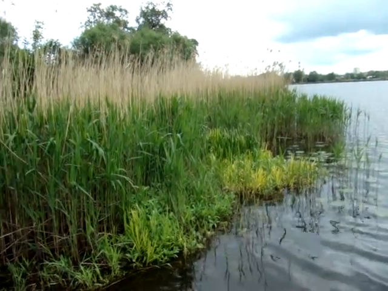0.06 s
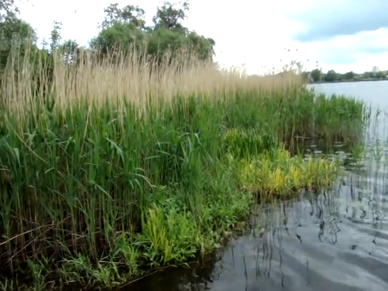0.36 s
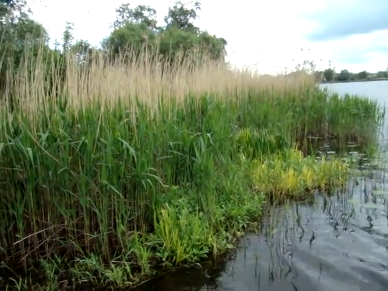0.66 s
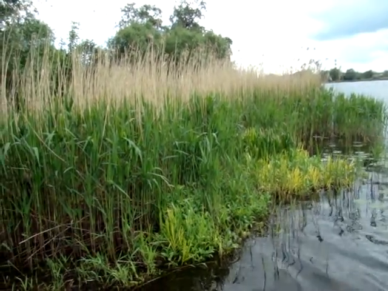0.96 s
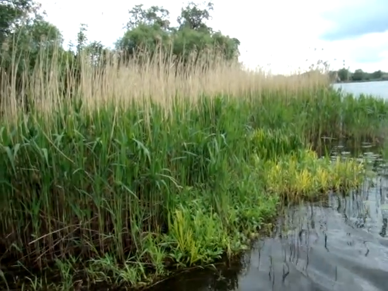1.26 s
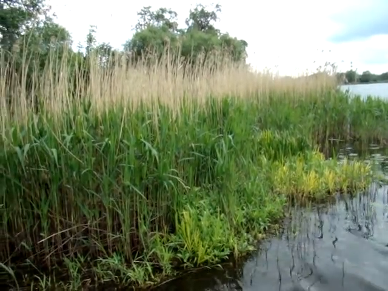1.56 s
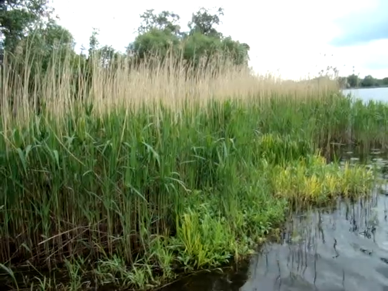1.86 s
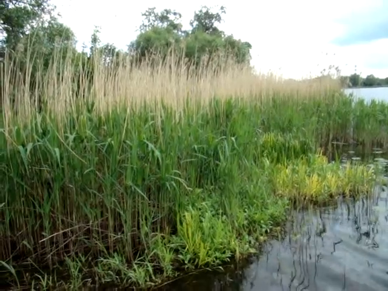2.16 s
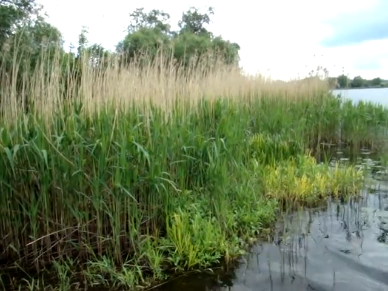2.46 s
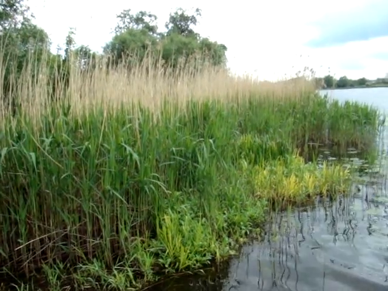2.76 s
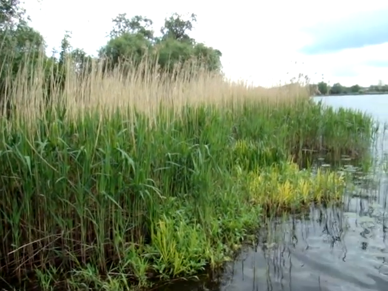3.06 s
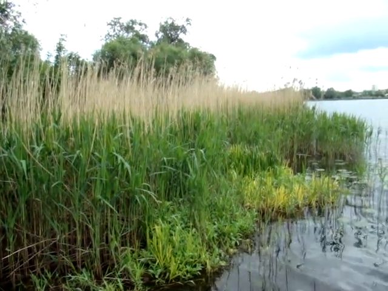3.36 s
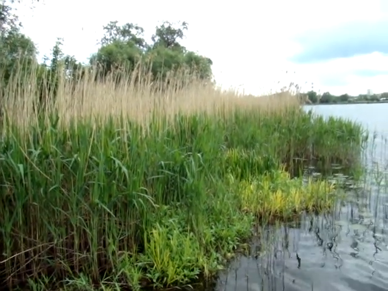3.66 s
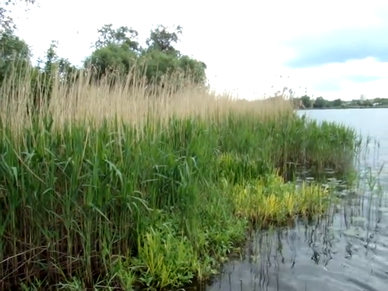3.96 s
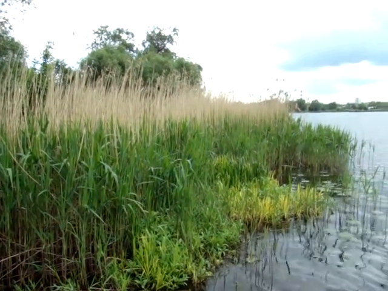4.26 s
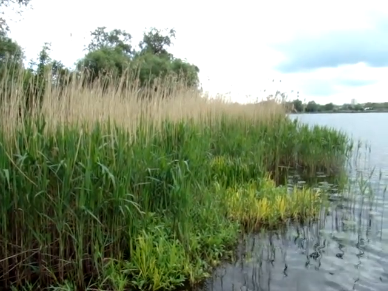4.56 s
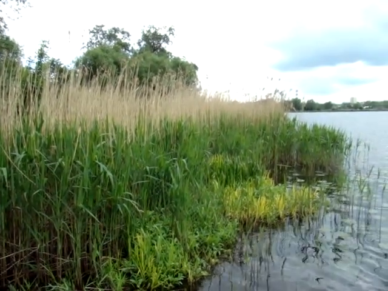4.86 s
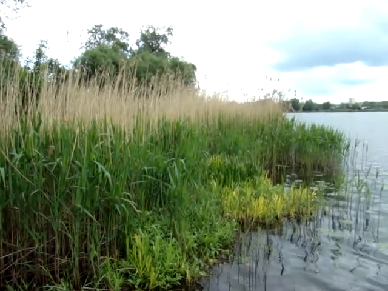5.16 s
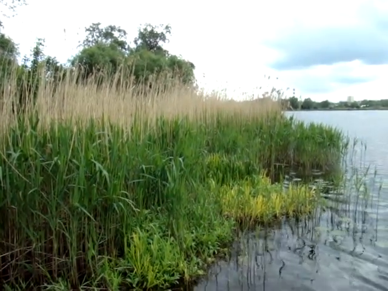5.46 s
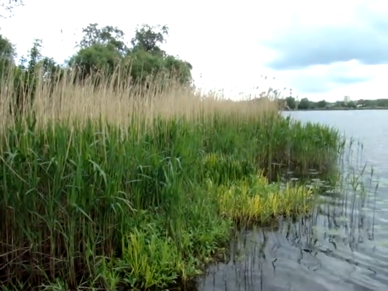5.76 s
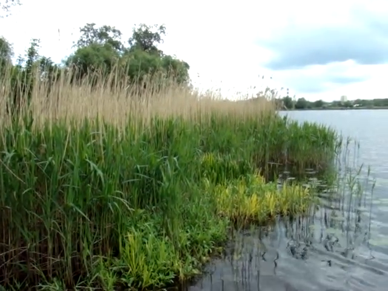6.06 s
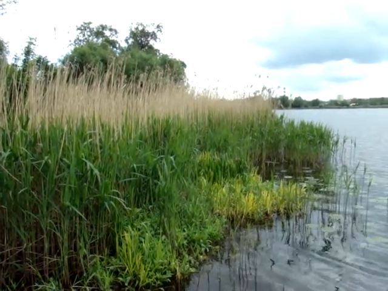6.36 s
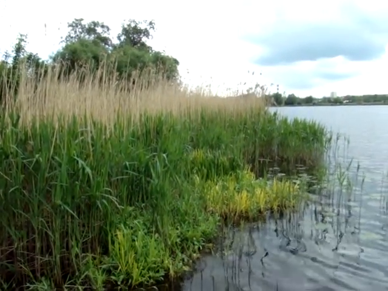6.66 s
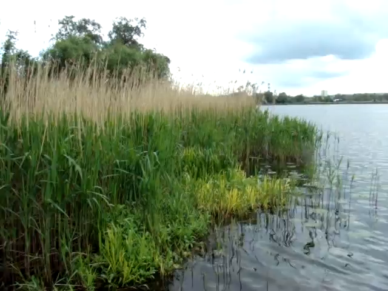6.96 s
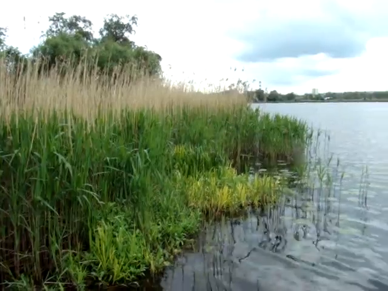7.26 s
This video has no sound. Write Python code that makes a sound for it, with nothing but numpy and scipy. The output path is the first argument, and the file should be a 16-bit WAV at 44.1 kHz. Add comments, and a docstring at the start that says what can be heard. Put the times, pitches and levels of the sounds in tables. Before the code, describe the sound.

Outdoors at a reedy lake shore, a soft hiss of wind and water lies under a nearby warbler. It starts with dry paired chucks and two squeaks, grows louder with four raspy notes, whistles once, then gives four harsh calls. A much fainter bird follows with slurred notes and evenly spaced chips from far away. A few small water plops and quiet camera lens ticks and whirs sit close to the microphone.

```python
"""A warbler sings in lakeside reeds: dry chucks, two squeaks, four grating notes, a nasal whistle and
four harsh calls. Its syrinx is the source and its throat the filter; a buzz modulates short tones
into rasps, and scattering by the reeds adds a short tail. A far songbird answers in gliding tones.
Ripples plop at the bank as damped noise bursts, and a camera's lens drive faintly rings its case.
A soft whir, probably the camera's motor, swells at times over a broadband wash of wind and water."""
import sys
import numpy as np
from scipy import signal
from scipy.fft import rfft, irfft, next_fast_len
from scipy.io import wavfile
from scipy.ndimage import uniform_filter1d

SR = 44100
rng = np.random.default_rng(int(sys.argv[2]) if len(sys.argv) > 2 else 0)


def to_wav(sig):
    """Store sig (one row per channel, or 1-D mono) as 16-bit WAV at the path in sys.argv[1].

    Samples outside -1..1 are clipped; the rate is SR.
    """
    pcm = np.clip(np.atleast_2d(sig), -1, 1) * 32767
    pcm = np.round(pcm).astype(np.int16)
    wavfile.write(sys.argv[1], SR, pcm.T)  # frames by channels


N = 326242
TIME = np.arange(N) / SR

# Levels in the tables are relative; the functions apply further gains.
# grating notes: start_s, level_db, pitch_hz, spacing_ratio, crescendo_db_per_s, rasp_ratio
GRATING_NOTES = [(2.001, -23.5, 3110, 0.88, 47, .7), (2.256, -17, 3317, 1.0, -7, 0.97),
                 (2.511, -17.5, 3376, 1.0, -17, 1.5), (2.757, -17, 3540, 0.98, -15, 1.36)]
# strokes of a grating note (a faint stutter, two rasps, a quick trill):
# centre_offset_s, nominal_length_s, level_db, pitch_ratio, nominal_glide_hz, rasp_ratio
GRATING_STROKES = [(-.051, 0.0046, -19.5, 1.06, -300, .9), (-.042, .005, -21.5, 0.95, -400, 0.7),
                   (-.028, 0.013, -20.5, 1.2, -200, 1), (-.013, 0.0044, -8.5, 1.07, -100, 1),
                   (-.006, .005, -5, 1.08, 100, 1), (.0005, .007, -1, 1.01, -100, 0.42),
                   (.009, 0.0064, -8, 0.92, -200, 0.8), (0.019, 0.0082, -1, 1.02, -200, .75),
                   (.027, 0.0056, -6, .97, -400, .8), (0.043, .012, -11.5, 1.0, -100, 0.6),
                   (0.05, 0.0025, -2.5, .99, -58, 0.1), (.0545, 0.0037, 1.5, 1.02, 68, 0.39),
                   (0.063, .0045, -.5, 1.03, -150, .75), (.068, 0.0037, -6, 1.02, -350, .85),
                   (0.079, .008, -3, .92, -400, 0.94)]
# harsh calls: start_s, level_db, pitch_hz, spacing_ratio, crescendo_db_per_s, rasp_ratio
HARSH_CALLS = [(3.412, -14.3, 3550, 1.0, 20, 1.0), (3.588, -13.3, 3560, 1.01, -5, 1.0),
               (3.870, -13, 3540, .99, -12, 1.0), (4.044, -14.6, 3510, 1.0, -12, 1.1)]
# strokes of a harsh call (a faint tick, then four rasps, the middle two entered from above):
# centre_offset_s, nominal_length_s, level_db, pitch_ratio, nominal_glide_hz, rasp_ratio
HARSH_STROKES = [(-.023, .004, -15, 1.0, -500, .9), (.0062, .0102, .5, .98, -60, .75),
                 (.02, .0065, -5, 1.07, -250, .85), (.032, .013, -.3, 1.0, -200, .87),
                 (.052, .0115, -4.5, 1.125, -200, .7), (.062, .0125, -.3, 1.0, -160, .8),
                 (.078, .0125, -2.8, .99, -260, .9)]
# lower edge of the throat's passband, rising as the beak opens: time_s, edge_hz
THROAT_EDGE = [(2.0, 2400), (2.8, 2600), (3.4, 2920)]
# spectrum of the noise skirt around the rasps: frequency_hz, gain_db
SKIRT_SPECTRUM = [(500, -28), (1100, -33), (1600, 12.5), (2150, 9.5), (2450, 3), (3500, -30), (4800, -5),
                  (5700, 12.5), (6300, -3), (7600, 2.5), (8600, 1.5), (9300, 4.5), (9900, -0.5)]
# dry chucks: start_s, level_db, nominal_pitch_hz
CHUCKS = [(0.174, -26, 2900), (0.326, -27, 2710), (0.588, -24.5, 2760), (0.7555, -23.5, 2740),
          (1.0461, -22, 2840), (1.2037, -22, 2940)]
# squeaks, in each of which the voice breaks: break_s, level_db, roughness_ratio
SQUEAKS = [(1.466, -0.5, 0.88), (1.733, 0.5, 1.6)]
# a squeak's slide up to the break: time_from_break_s, pitch_hz, level_db, roughness_ratio
SQUEAK_SLIDE = [(-.063, 1428, -53, 0.01), (-.035, 1473, -35, 0.18), (-.013, 1537, -29.5, 0.13),
                (0, 1835, -26, 0.48), (.007, 1815, -32, .45)]
# the lower pitch it then holds: time_from_break_s, pitch_hz, level_db, roughness_ratio
SQUEAK_HOLD = [(-.004, 1383, -42, 0.42), (.002, 1385, -22, 0.33), (0.029, 1376, -25.5, 0.13),
               (.046, 1382, -29.5, .25), (.057, 1370, -33, 0.11)]
# the whistle scoops up, climbs and holds: time_s, pitch_hz, level_db, roughness_ratio
WHISTLE = [(3.011, 1180, -46, .5), (3.02, 1370, -27, 0.1), (3.029, 1423, -24.5, 0.06),
           (3.06, 1413, -23.5, 0), (3.098, 1461, -25.5, 0.1), (3.168, 1469, -26.5, 0.17),
           (3.186, 1480, -48, 0.4)]
# throat response for the squeaks and the whistle: frequency_hz, gain_db
THROAT_RESPONSE = [(1400, -17.5), (2100, -20), (2780, -9), (2950, -6), (3650, 4), (4200, -1.5), (4450, -3),
                   (4900, -5), (5500, 1.5), (5950, -0.5), (6400, -34), (7300, -16), (8700, -21.5),
                   (9700, -15), (10300, -56)]
# the far bird's slurs: start_s, length_s, level_db, nominal_pitch_hz, shape_name
FAR_SLURS = [(1.588, 0.082, -45, 2950, "rise"), (4.376, 0.032, -47, 3090, "level"),
             (4.437, .026, -45, 3210, "rise"), (4.47, .045, -45.5, 2750, "fall"),
             (5.038, 0.063, -45, 2420, "level"), (5.312, 0.059, -45, 2430, "fall"),
             (5.423, 0.096, -49, 3800, "dip"), (5.495, .035, -53, 3640, "fall"),
             (5.596, 0.081, -47.5, 2520, "fall"), (5.602, .085, -48.5, 3700, "dip"),
             (5.682, 0.028, -47, 3480, "fall"), (5.835, 0.048, -47, 3410, "rise"),
             (6.047, 0.059, -47, 3410, "rise"), (6.257, 0.042, -48.5, 3400, "rise"),
             (6.352, .07, -52, 3100, "rise"), (6.78, .1, -59, 3800, "dip"),
             (7.167, 0.072, -52, 3250, "rise")]
# pitch contour for each shape_name: start_ratio, middle_ratio, end_ratio
SLUR_SHAPES = {"rise": (.92, 0.99, 1.16), "fall": (1.15, 0.94, .87), "dip": (1.03, 1, 1.08),
               "level": (0.98, 1.01, 0.92)}
# the far bird's chips: start_s, level_db
FAR_CHIPS = [(5.784, -42.5), (5.947, -42), (6.102, -41), (6.251, -43), (6.402, -43.5), (6.559, -42.5),
             (6.718, -43.5), (6.888, -45.5), (7.04, -47)]
# plops of water: start_s, level_db, pitch_hz
PLOPS = [(0.307, -27, 364), (0.812, -35, 926), (0.819, -26, 620), (0.918, -29, 920), (0.999, -36, 797),
         (2.679, -27, 1390)]
# runs of lens drive steps: start_s, step_count, frames_per_step, level_db
LENS_RUNS = [(.49, 16, 2, -31), (1.822, 4, 3, -31.5), (2.291, 6, 2, -32), (4.457, 6, 2, -35),
             (4.891, 6, 2, -35), (5.489, 4, 2, -28.5), (5.756, 5, 2, -33)]
# swells of soft whirring hiss: hold_start_s, hold_length_s, level_db
WHIRS = [(.26, .36, -45.5), (4.84, .46, -44), (7.25, .2, -46.5)]
# spectrum of the whir: frequency_hz, gain_db
WHIR_SPECTRUM = [(800, -6), (1150, 1), (1350, 18), (1600, 5.5), (2200, 3), (3200, 2), (4500, -1.5),
                 (5700, -1), (6500, -8.5), (8000, -12), (10000, -28)]
# spectrum of wind and water: frequency_hz, gain_db
WASH_SPECTRUM = [(15, -60), (25, -36), (85, -16), (107, -9), (227, 0), (384, -1), (414, -6.5), (719, -4),
                 (857, -7), (1770, -8), (2010, -10.5), (2520, -13), (2780, -12.5), (5480, -25),
                 (10000, -30), (13000, -62.5), (22000, -120)]
# the breeze comes and goes: time_s, level_db
BREEZE = [(0, -47.5), (.75, -47.5), (1.5, -46.5), (2.2, -45.5), (2.55, -45.5), (3.15, -48.5), (3.8, -47),
          (4.5, -49), (5.15, -48), (5.8, -47.5), (7.2, -48.5), (7.4, -47.5)]
# faint steady rings: centre_hz, width_hz, level_db
RINGS = [(395.5, 2.5, -61), (225, 24, -61.5), (857, 296, -53), (1614, 360, -53), (2960, 21, -64.5)]
# spells of a thin wavering whine: hold_start_s, hold_length_s, level_db
WHINE_SPELLS = [(2.75, 0.64, -55), (3.18, .1, -51.5), (4.15, 0.21, -51), (5.2, .4, -49.5),
                (6.65, 0.87, -51)]
# one brief bright hiss: hold_start_s, hold_length_s, level_db
SWISHES = [(.265, 0.072, -49)]


def warbler(chuck_db=-10, close_after_s=.076, close_db=-5, close_hz=2950):
    """Source and filter: the syrinx drives the throat in rasps, chucks, squeaks and a whistle."""
    out = rasps(GRATING_NOTES, GRATING_STROKES, skirt_db=-23,
                sizzle_db=-25, sizzle_ratio=2.64, sizzle_width_hz=1700,
                second_db=-34, third_db=-40, buzz_hz=961, depth=.37, bend_rad=.51, top_hz=5100)
    out += rasps(HARSH_CALLS, HARSH_STROKES, skirt_db=-21,
                 sizzle_db=-28, sizzle_ratio=2.62, sizzle_width_hz=2900,
                 second_db=-31.5, third_db=-30, buzz_hz=736, depth=.46, bend_rad=.62, top_hz=4500)
    # each grating note closes on a low chuck
    closes = [(start + close_after_s * spacing, db + crescendo * close_after_s + close_db, close_hz)
              for start, db, _, spacing, crescendo, _ in GRATING_NOTES]
    for start, db, hz in CHUCKS + closes:
        offset, sound = chuck(hz)
        add(out, start + offset, amp(db + chuck_db) * sound)
    for break_s, db, roughness in SQUEAKS:
        for contour in (SQUEAK_SLIDE, SQUEAK_HOLD):
            offset, sound = nasal_tone(np.array(contour) * [1, 1, 1, roughness])
            add(out, break_s + offset, amp(db) * sound)
    add(out, *nasal_tone(WHISTLE))
    return out


def rasps(notes, strokes, skirt_db, sizzle_db, sizzle_ratio, sizzle_width_hz, **voice):
    """Amplitude modulation: a wide noise skirt and a high sizzle follow the envelope of the strokes."""
    spread_db, pitch_spread = 1.9, .0062  # no two strokes are quite alike
    tones, sizzle = np.zeros((2, N))
    for note_s, note_db, hz, spacing, crescendo, note_rasp in notes:
        edge_hz = curve(THROAT_EDGE, note_s)
        for offset, length, db, ratio, glide, rasp in strokes:
            softer, higher = rng.standard_normal(2)
            gain = amp(note_db + db + crescendo * offset - spread_db * softer)
            pitch = hz * ratio * (1 + pitch_spread * higher)
            sound = gain * stroke(length, pitch, glide, rasp * note_rasp, edge_hz, **voice)
            hiss = narrow_noise(len(sound), sizzle_ratio * hz, sizzle_width_hz)
            start = note_s + offset * spacing - len(sound) / SR / 2
            add(tones, start, sound)
            add(sizzle, start, abs(signal.hilbert(sound)) * hiss)
    envelope = np.sqrt(abs(uniform_filter1d(tones ** 2, size=130)))
    return tones + amp(skirt_db) * envelope * coloured(SKIRT_SPECTRUM) + amp(sizzle_db) * sizzle


def stroke(length, hz, glide, rasp, edge_hz, second_db, third_db, buzz_hz, depth, bend_rad, top_hz):
    """A buzz from one side of the syrinx modulates the amplitude and phase of the other side's tone."""
    stretch, jitter = 1.45, .076
    size = int(length * stretch * SR)
    rasp = np.clip(rasp, 0, 1)
    position = np.linspace(-.5, .5, size) * stretch
    # with the beak wide open, long strokes start higher and fall further
    opening = np.clip((edge_hz - 2500) / 400, 0, 1)
    fall = 520 * opening * np.clip((length - .004) / .006, 0, 1)
    pitch = (hz + (glide - fall) * position) * (1 + jitter * rasp * wander(size, 516))
    buzz_cycles = np.cumsum(buzz_hz * (1 + .323 * wander(size, 293))) / SR + rng.random()
    buzz = rasp * np.cos(2 * np.pi * buzz_cycles)
    phase = 2 * np.pi * np.cumsum(pitch) / SR + bend_rad * buzz
    envelope = (1 + depth * buzz) * signal.windows.tukey(size, .75)
    # the throat passes a steep band round the fundamental; little of the overtones gets out
    fundamental = np.pad(envelope * np.sin(phase), 64)
    fundamental = band(fundamental, edge_hz, top_hz, low_order=18.5, high_order=2.77)
    overtones = amp(second_db) * np.sin(2 * phase) + amp(third_db) * np.sin(3 * phase)
    sound = fundamental + np.pad(envelope * overtones, 64)
    return unit(sound) * np.sqrt(length * SR / len(sound))


def chuck(hz, decay_s=.015, fall_s=.034, clap_hz=150, scratch_db=-20):
    """Forced resonance: a faint scratch, then claps of the syrinx, excite a falling throat resonance."""
    t = np.arange(-.04, .06, 1 / SR)
    since_onset = np.maximum(t, 0)
    claps = 1 + .22 * np.cos(2 * np.pi * clap_hz * (t - .004))
    attack = np.clip((t + .002) / .007, 0, 1) ** 2
    scratch = amp(scratch_db) * np.exp(-abs(t) / .028)
    envelope = attack * np.exp(-since_onset / decay_s) * claps + scratch
    throat_hz = hz * (.75 + .28 * np.exp(-since_onset / fall_s))
    sound = resonate(envelope * rng.standard_normal(len(t)), throat_hz, width_hz=1100)
    return t[0], unit(band(sound, 2100, 4600, high_order=.95))


def nasal_tone(contour, jitter=.034, shimmer=.63, hoarseness=.18, second_voice_db=-2):
    """The throat filters a harmonic series; roughness adds jitter, shimmer and a noisy second voice."""
    times, *columns = np.transpose(contour)
    t = np.arange(times[0], times[-1], 1 / SR)
    size = len(t)
    hz, db, roughness = (np.interp(t, times, column) for column in columns)
    phase = 2 * np.pi * np.cumsum(hz * (1 + jitter * roughness * wander(size, 400))) / SR
    tone = np.zeros(size)
    for k in range(1, 8):
        harmonic = amp(curve(THROAT_RESPONSE, k * hz)) * np.sin(k * phase + rng.uniform(0, 2 * np.pi))
        tone += harmonic * (1 + hoarseness * wander(size, 230))
    second_voice = amp(second_voice_db) * roughness * narrow_noise(size, hz=5060, width_hz=260)
    sound = unit(tone) * (1 + roughness * shimmer * wander(size, 600)) + second_voice
    return times[0], amp(db) * sound * signal.windows.tukey(size, .1)


def reed_echoes(x, early_db, early_t60_s, late_db, late_t60_s):
    """Scattering: near stems return quick echoes, the whole bed and the trees a longer tail."""
    t = np.arange(SR) / SR
    echoes_per_s = 4000
    early, late = rng.choice([-1., 1.], (2, SR)) * (rng.random((2, SR)) < echoes_per_s / SR)
    early = early * amp(-60 * t / early_t60_s) * (t > .001)
    late = late * amp(-60 * t / late_t60_s) * np.minimum(t / .041, 1)
    response = amp(early_db) * early / np.linalg.norm(early) + amp(late_db) * late / np.linalg.norm(late)
    return x + signal.fftconvolve(x, response)[:N]


def far_bird(gain_db=-5, flick_db=-5, echo_db=-8, echo_s=.045):
    """Frequency sweeps make slurs and chips; each chip opens with a flick and reflects off the trees."""
    out = np.zeros(N)
    for start, length, db, hz, shape in FAR_SLURS:
        add(out, start, amp(db) * slur(length, hz * np.array(SLUR_SHAPES[shape])))
    flick_hz = np.linspace(5000, 3400, int(.0091 * SR))
    for start, db in FAR_CHIPS:
        flick = resonate(rng.standard_normal(len(flick_hz)), flick_hz, width_hz=1100)
        add(out, start, amp(db + flick_db) * unit(flick * np.hanning(len(flick))))
        chip = slur(.0272, np.array([3250, 2840, 2740]) * (1 + .013 * rng.standard_normal()))
        add(out, start + .0034, amp(db) * chip)
        add(out, start + echo_s, amp(db + echo_db) * chip)
    return amp(gain_db) * out


def slur(length_s, pitches_hz):
    """Frequency modulation: a pure tone wavers along a parabola through three pitches."""
    size = int(length_s * SR)
    parabola = np.polyfit([0, .5, 1], pitches_hz, 2)
    hz = np.polyval(parabola, np.linspace(0, 1, size)) * (1 + .006 * wander(size, 200))
    return unit(np.sin(2 * np.pi * np.cumsum(hz) / SR) * signal.windows.tukey(size, .5))


def ripples(gain_db=-9, decay_s=.0095, width_hz=900):
    """Heavily damped resonance: each slap of water on the bank is a short, dull burst of noise."""
    out, t = np.zeros(N), np.arange(int(.035 * SR)) / SR
    for start, db, hz in PLOPS:
        slap = rng.standard_normal(len(t)) * np.exp(-t / decay_s)
        add(out, start, amp(db + gain_db) * unit(resonate(slap, hz, width_hz)))
    return band(out, 330, 3500, low_order=2, high_order=.43)


def lens_drive(gain_db=-1, spread_db=1.9, ring_hz=1620, decay_s=.0015, frame_s=1 / 30):
    """Impulse excitation: each step of the lens drive briefly rings one mode of the camera's case."""
    out, t = np.zeros(N), np.arange(int(.02 * SR)) / SR
    envelope = t / decay_s * np.exp(1 - t / decay_s)
    for start, count, frames, db in LENS_RUNS:
        for step in range(count):
            ring = np.sin(2 * np.pi * ring_hz * (1 + .0072 * rng.standard_normal()) * t)
            gain = amp(db + gain_db + spread_db * rng.standard_normal())
            add(out, start + step * frames * frame_s, gain * ring * envelope)
    return out


def whir(whir_db=-1):
    """Swells of soft whirring hiss with a resonance near 1350 Hz, probably the camera's motor."""
    envelope = swells(WHIRS, rise_s=.097, fall_s=.092)
    return envelope * amp(whir_db + wander(N, 40)) * coloured(WHIR_SPECTRUM)


def wind_and_water(wash_db=-44, flutter_db=1.29):
    """Modulated broadband noise: the wash flutters and follows the breeze."""
    breeze_db = curve(BREEZE, TIME)
    breeze_db -= np.median(breeze_db)
    return amp(wash_db + breeze_db + flutter_db * wander(N, 30)) * coloured(WASH_SPECTRUM)


def faint_background(whine_db=-1):
    """Band-limited noise: narrow bands are heard as rings and a whine, a wide one as a brief hiss."""
    rings = sum(amp(db) * narrow_noise(N, hz, width) for hz, width, db in RINGS)
    whine = swells(WHINE_SPELLS, rise_s=.21, fall_s=.15) * narrow_noise(N, hz=1815, width_hz=45)
    hiss = unit(band(rng.standard_normal(N), 6000, 9800, low_order=3))
    return rings + amp(whine_db) * whine + swells(SWISHES, rise_s=.008, fall_s=.022) * hiss


def amp(db):
    """Decibels to amplitude ratio."""
    return 10 ** (np.asarray(db) / 20)


def unit(x):
    """Normalisation to rms 1."""
    return x / np.sqrt(np.mean(x ** 2) + 1e-20)


def curve(rows, x):
    """Linear interpolation between rows of x, value."""
    return np.interp(x, *np.transpose(rows))


def add(mix, start_s, sound):
    """Superposition: a sound joins the mix at start_s."""
    part = mix[max(0, round(start_s * SR)):][:len(sound)]
    part += sound[:len(part)]


def swells(rows, rise_s, fall_s):
    """Envelopes that grow exponentially, hold and decay exponentially."""
    return sum(amp(db) * np.exp(np.minimum(TIME - s, 0) / rise_s - np.maximum(TIME - s - hold, 0) / fall_s)
               for s, hold, db in rows)


def coloured(spectrum):
    """Spectral shaping of white noise by rows of frequency_hz, gain_db."""
    hz, db = np.transpose(spectrum)
    size = next_fast_len(N, True)
    bins_hz = np.fft.rfftfreq(size, 1 / SR)
    gain = amp(np.interp(np.log(bins_hz + 1), np.log(hz + 1), db))
    return unit(irfft(rfft(rng.standard_normal(size)) * gain, size)[:N])


def wander(size, hz):
    """Random fluctuation of rms near 1: noise low-passed at hz."""
    pole = np.exp(-2 * np.pi * hz / SR)
    noise = rng.standard_normal(size + 2048)
    return unit(signal.lfilter([1], [1, -2 * pole, pole * pole], noise))[-size:]


def resonate(x, hz, width_hz):
    """Resonance at a fixed or moving pitch: shift down by hz, low-pass, shift back."""
    carrier = np.exp(2j * np.pi * np.cumsum(hz * np.ones(len(x))) / SR)
    pole = np.exp(-np.pi * width_hz / SR)
    baseband = signal.lfilter([(1 - pole) ** 2], [1, -2 * pole, pole * pole], x / carrier)
    return 2 * (carrier * baseband).real


def narrow_noise(size, hz, width_hz):
    """A resonance driven by white noise, at rms 1."""
    return unit(resonate(rng.standard_normal(size), hz, width_hz))


def band(x, low_hz, high_hz, low_order=8, high_order=8):
    """Band-pass filtering: each edge falls by 6 dB per octave per order."""
    size = next_fast_len(len(x) + 1024, True)
    hz = np.fft.rfftfreq(size, 1 / SR) + 1
    gain = 1 / np.sqrt((1 + (low_hz / hz) ** (2 * low_order)) * (1 + (hz / high_hz) ** (2 * high_order)))
    return irfft(rfft(x, size) * gain, size)[:len(x)]


def scene():
    """Superposition at one microphone; the far bird has the larger share of reverberant sound."""
    near = reed_echoes(warbler(), early_db=-14, early_t60_s=.07, late_db=-16.3, late_t60_s=.3)
    far = reed_echoes(far_bird(), early_db=-5, early_t60_s=.2, late_db=-3.5, late_t60_s=.55)
    return (near + far + wind_and_water() + whir() + faint_background() + lens_drive() + ripples())[None]


def record(dry, asymmetry=.017, cutoff_hz=10170):
    """Quadratic distortion in the small microphone bends loud notes slightly; a steep low-pass follows."""
    bent = dry + asymmetry * dry ** 2
    low_pass = signal.firwin(601, cutoff_hz, window=("kaiser", 7), fs=SR)
    return signal.oaconvolve(bent, low_pass[None], "same")


dry = scene()
out = record(dry)
to_wav(out)
```